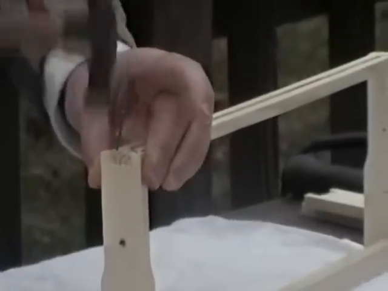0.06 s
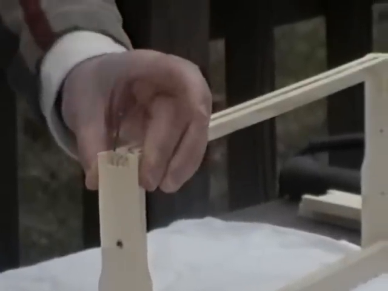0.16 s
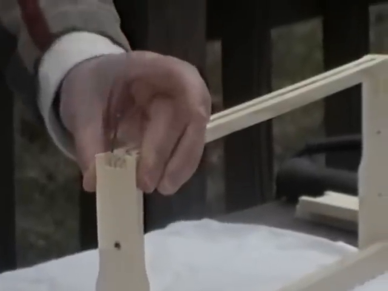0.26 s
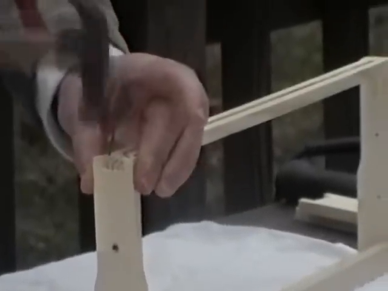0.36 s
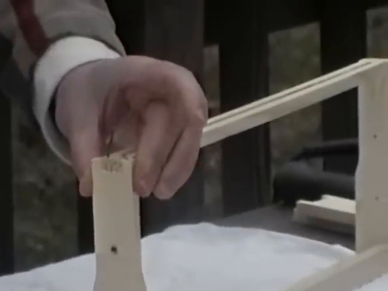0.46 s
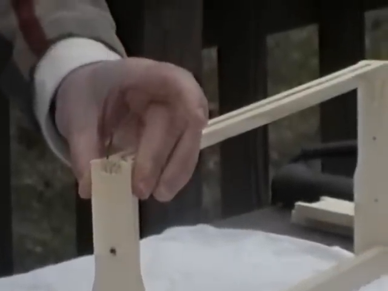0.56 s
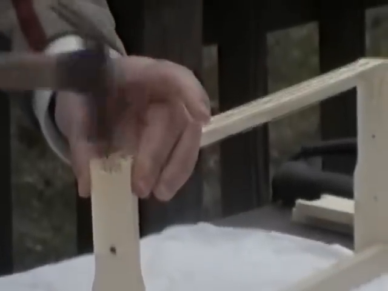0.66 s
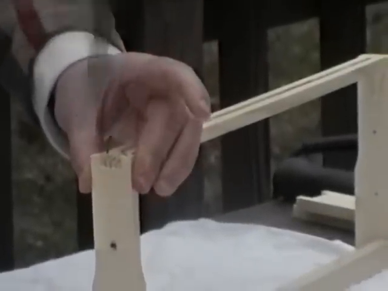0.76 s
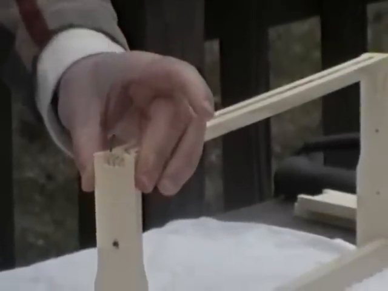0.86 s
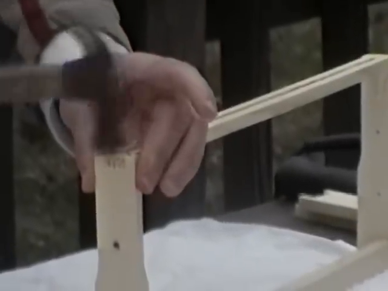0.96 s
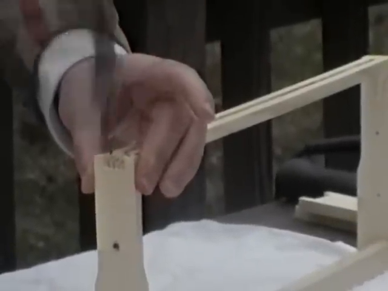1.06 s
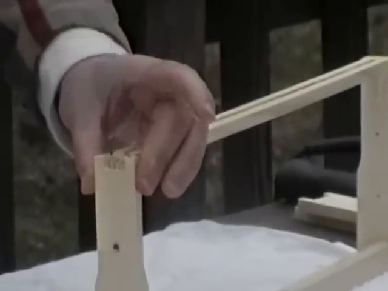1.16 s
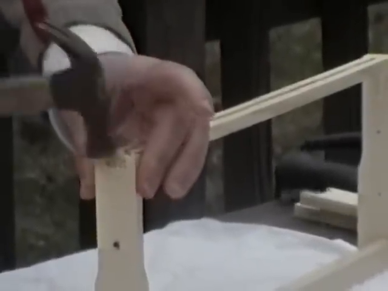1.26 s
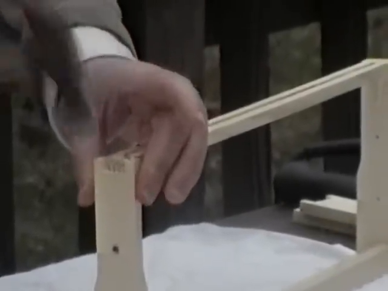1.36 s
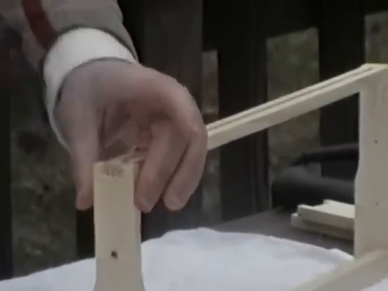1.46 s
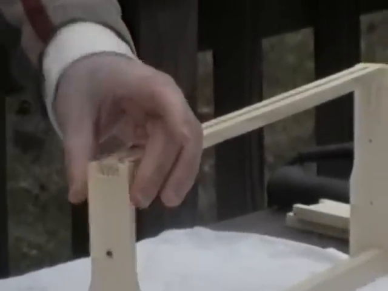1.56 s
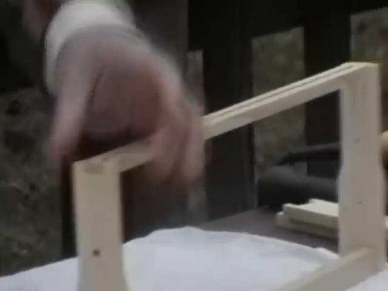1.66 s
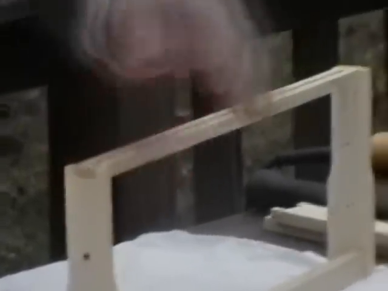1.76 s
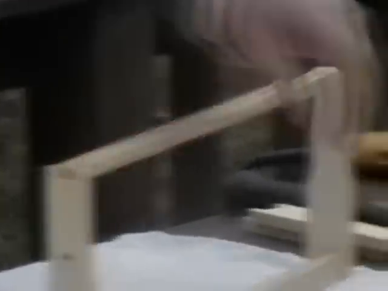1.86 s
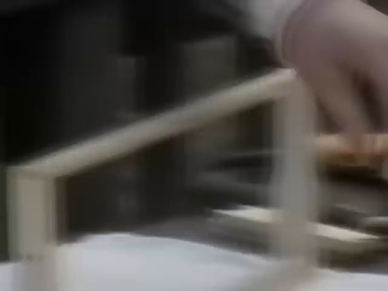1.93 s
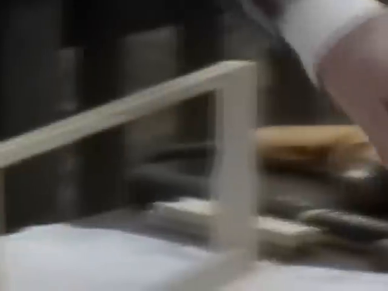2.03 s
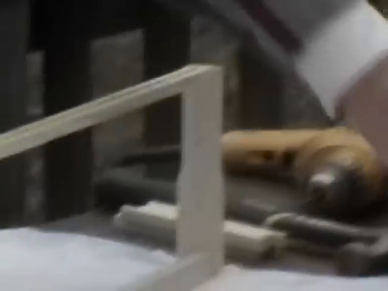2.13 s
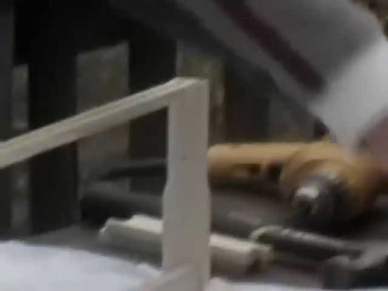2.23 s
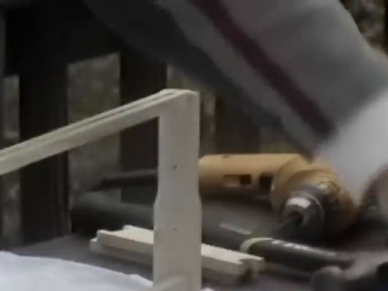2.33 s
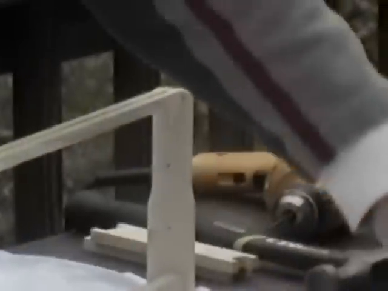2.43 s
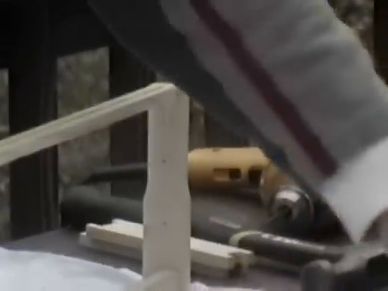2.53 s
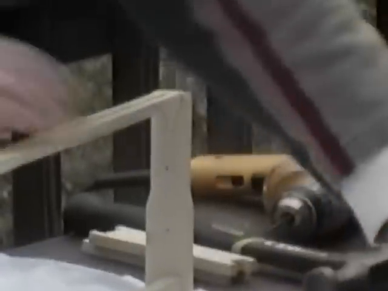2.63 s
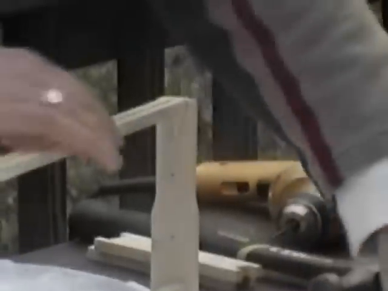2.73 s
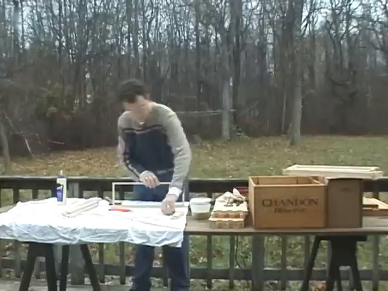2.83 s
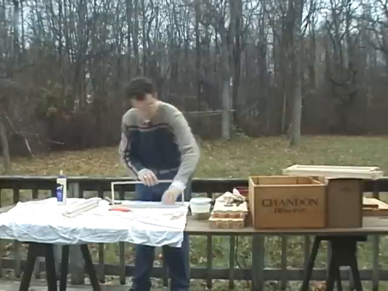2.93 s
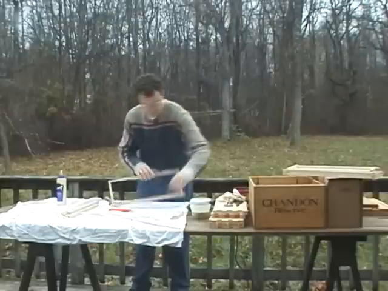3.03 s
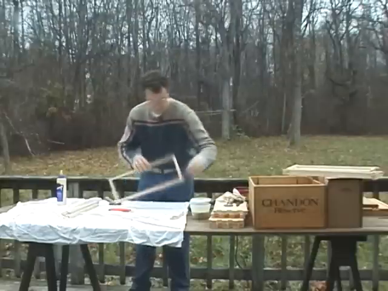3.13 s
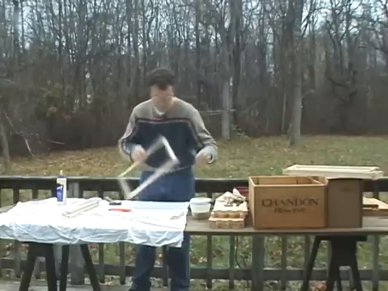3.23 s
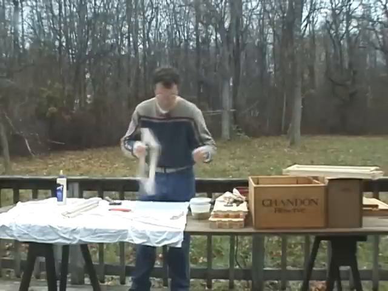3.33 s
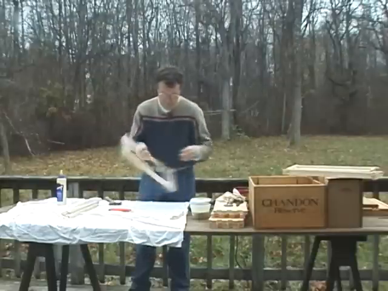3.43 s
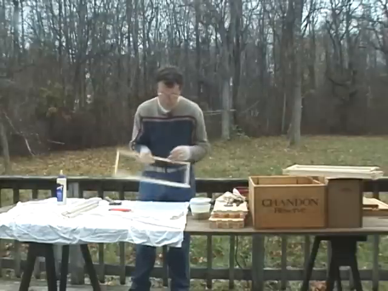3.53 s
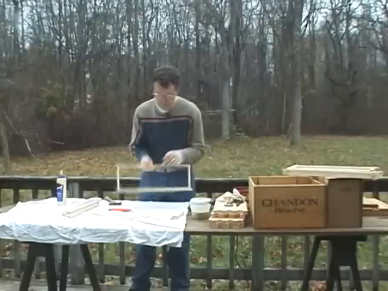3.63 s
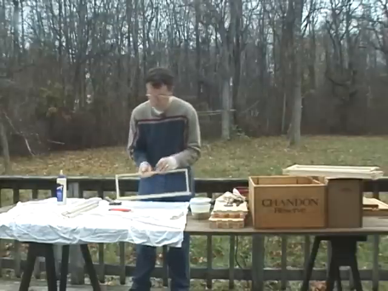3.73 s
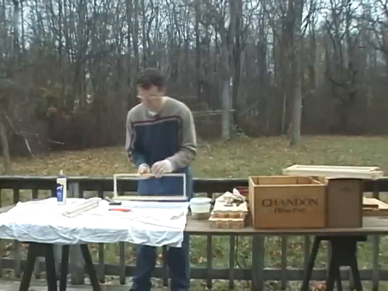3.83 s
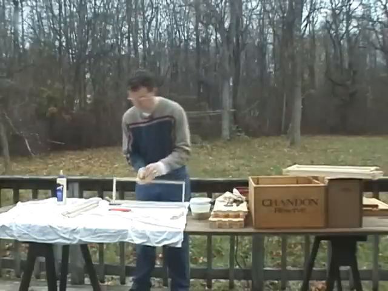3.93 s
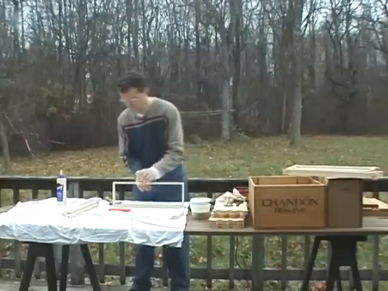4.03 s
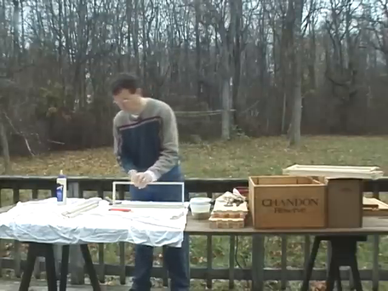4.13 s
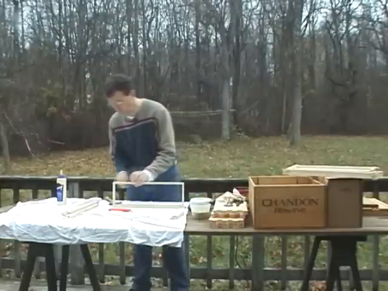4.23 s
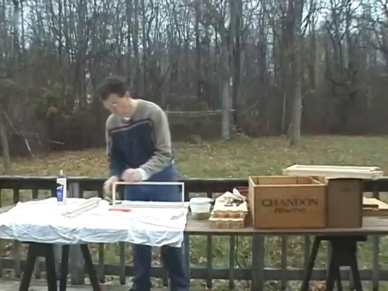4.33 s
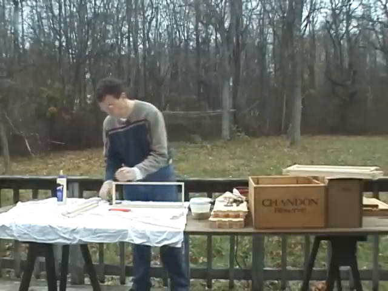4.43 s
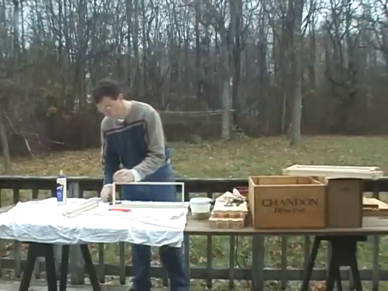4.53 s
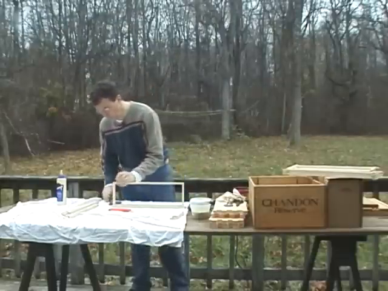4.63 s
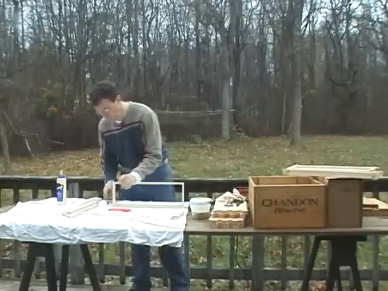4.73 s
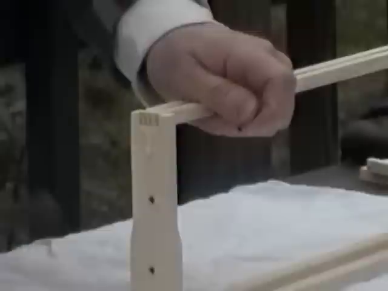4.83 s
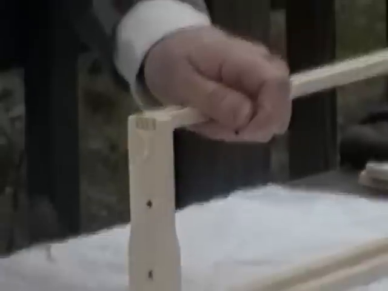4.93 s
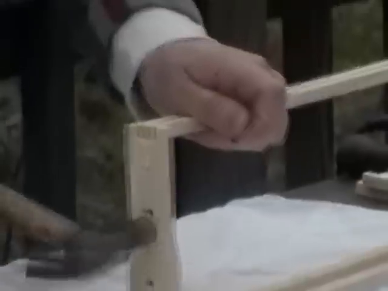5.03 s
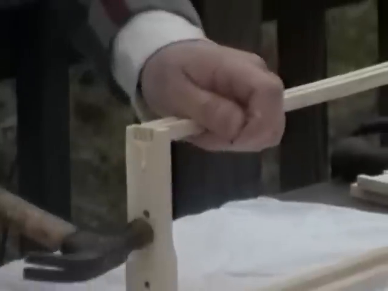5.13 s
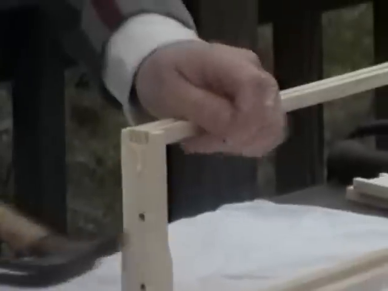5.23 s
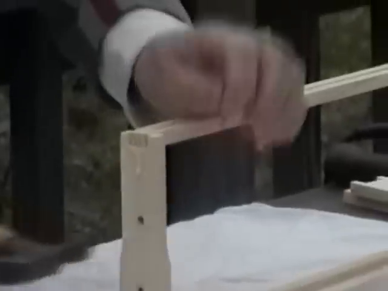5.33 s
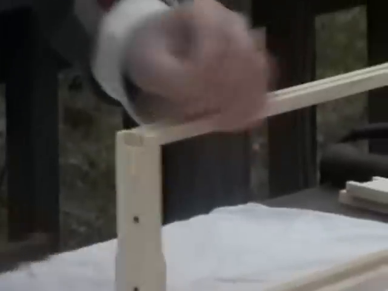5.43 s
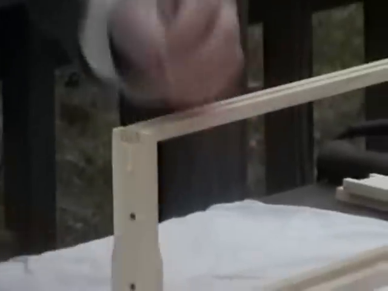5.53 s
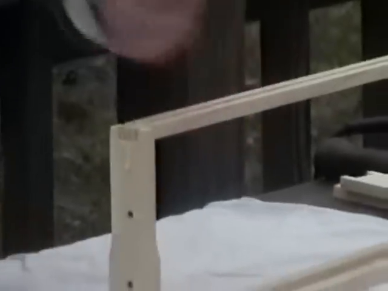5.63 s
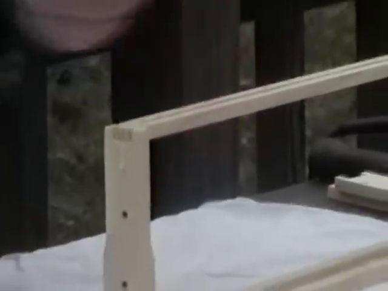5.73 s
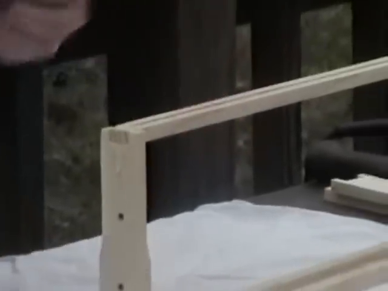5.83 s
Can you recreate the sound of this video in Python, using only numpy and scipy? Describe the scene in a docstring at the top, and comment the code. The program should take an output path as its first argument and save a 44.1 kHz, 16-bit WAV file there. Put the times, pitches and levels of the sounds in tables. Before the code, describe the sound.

Five steady, very loud wood-and-steel hammer blows, boxy and slightly clipped, shake loose nails and boards on the table. Then a clustered clatter as the hammer is set down, near quiet with tiny metallic ticks, a lighter knock as the frame is put down, and one last hard clack. Open yard, diffuse echo, low wind rumble, hiss and faint hum.

```python
"""Hard hammer knocks ring a trestle table on a garden deck as a small nail is driven into a wooden frame;
later the hammer and the frame are set down. Struck wood and steel are sums of decaying modes; chattering wood
is a train of random impacts; jingling nails and the thudding deck are shaped noise. A small microphone overloads
on the hardest knocks, over a diffuse echo, faint wind, hiss and hum."""
import sys
import numpy as np
from scipy import signal
from scipy.fft import rfft, irfft, next_fast_len
from scipy.io import wavfile
from scipy.ndimage import uniform_filter1d, map_coordinates

SR = 44100
rng = np.random.default_rng(int(sys.argv[2]) if len(sys.argv) > 2 else 0)


def volts(x):
    """Linear amplitude factor 10**(x/20) for a level x in dB, scalar or array-like."""
    e = np.asarray(x, float) / 20
    return 10 ** e


def wav_record(signal):
    """Record a signal, one row per channel, as 16-bit PCM in the file named by sys.argv[1]."""
    frames = np.transpose(np.atleast_2d(signal))
    bounded = np.clip(frames, -1, 1)
    # unit amplitude maps onto the largest positive 16-bit level
    quanta = np.round(bounded * 32767).astype(np.int16)
    wavfile.write(sys.argv[1], SR, quanta)


N = 259308
TIME = np.arange(SR // 2) / SR  # time axis of one short sound [s]
SPREAD_DB = 2.5  # random change of wood mode strengths from blow to blow

# knocks on the table: (time [s], blow level [dB], favoured wood pitch [Hz],
# steel click re blow [dB], shaking of loose things re blow [dB])
KNOCKS = [(0.089, 13, 545, -39.5, -48.5), (.4240, 12.5, 548, -26.5, -47), (0.7617, 10.5, 500, -22.5, -44),
          (1.0670, 13.5, 500, -25.5, -47), (1.35, 14, 440, -34, -48.5), (2.2904, -0.5, 651, -30, -66.5),
          (2.3006, 4, 601, -42, -65.5), (2.3742, 2.5, 408.5, -33, -64), (4.0688, -10, 332, -38, -60),
          (4.1055, 2.5, 522, -48.5, -66), (4.5840, -43.5, 276, -47.5, -26), (5.1530, -7.5, 1500, -4, -42.5)]
# modes of frame and table top: (frequency [Hz], relative level [dB], t60 [s])
WOOD_MODES = [(155, -4.5, 0.094), (187, -2.5, 0.12), (269, -34.5, 0.42), (290.8, -9.5, 0.19),
              (366, 3, 0.027), (466, 0, 0.034), (500, 7.5, 0.0033), (531, -6.5, 0.046), (600, 2.5, 0.027),
              (719.7, -6.5, 0.07), (792, -2, 0.037), (894, 0, 0.029), (992, -7, 0.12), (1054, -9.5, 0.098),
              (1127.7, -4.5, 0.051), (1272, 11, 0.015), (1513, -6.5, 0.11), (1440, -12.5, 0.03),
              (1588, -0.5, 0.032), (1700, -2, 0.031), (1870, -8.5, 0.11), (2092, -13, 0.091),
              (2360, -18.5, 0.09), (2840, -10, 0.034), (2920, -11.5, .04), (4020, -9, 0.03),
              (4850, -9.5, 0.027)]
# low rumble of wind and of the trembling deck: (frequency [Hz], relative level per Hz [dB])
RUMBLE_SPECTRUM = [(8.8, -55.5), (15, 16.5), (64, 8), (146, 1), (181, -3.5), (200, -8), (260, -43),
                   (440, -120)]


def unit(x):
    """Normalisation: scales a signal to rms 1."""
    return x / np.sqrt(np.mean(x ** 2) + 1e-20)


def along(points, hz):
    """Interpolation of (frequency [Hz], value) points on a logarithmic frequency axis."""
    f, v = np.transpose(points)
    return np.interp(np.log(hz + 1), np.log(f + 1), v)


def coloured(x, spectrum):
    """Linear filtering: multiplies the spectrum of x by a gain of (frequency [Hz], level [dB]) points."""
    size = x.shape[-1]
    padded = next_fast_len(size + 8192)
    gain = volts(along(spectrum, np.fft.rfftfreq(padded, 1 / SR)))
    return irfft(rfft(x, padded) * gain, padded)[..., :size]


def noise(spectrum, size):
    """Stationary random noise of rms 1 with the given spectrum."""
    return unit(coloured(rng.standard_normal(size), spectrum))


def decaying_noise(t60s, size):
    """Frequency-dependent damping: noise in which each frequency dies at its own speed."""
    hz, t, z = signal.stft(rng.standard_normal(size), SR, nperseg=256)
    decay = volts(-60 * t / along(t60s, hz)[:, None])
    return signal.istft(z * decay, SR, nperseg=256)[1][:size]


def wobble(rate):
    """Slow random modulation: a smooth curve through `rate` random knots a second."""
    knots = rng.standard_normal(int(N * rate / SR) + 4)
    return map_coordinates(knots, [np.arange(N) * rate / SR])


def add(track, s, sound):
    """Superposition: mixes a sound into the track from time s [s]."""
    part = track[round(s * SR):][:len(sound)]
    part += sound[:len(part)]


def fade(t60):
    """Exponential decay by 60 dB in t60 seconds."""
    return volts(-60 * TIME / t60)


def ring(modes, spread_db, centre_hz, focus_db):
    """Modal response to a smooth push that favours modes near centre_hz; peak 1, first swing downward."""
    hz, db, t60 = np.transpose(modes)[:, :, None]
    octaves = np.log2(hz / centre_hz)
    db = db + spread_db * rng.standard_normal(db.shape) - focus_db * octaves ** 2
    # far modes start out of step
    phase = 0.9 * rng.standard_normal(db.shape) * np.minimum(np.abs(octaves), 1)
    free = -np.sum(volts(db - 60 * TIME / t60) * np.sin(2 * np.pi * hz * TIME + phase), axis=0)
    # a softer contact, with a lower pitch, lasts longer
    contact = np.minimum(TIME[:300] * centre_hz / 0.4, 1)
    push = np.sin(np.pi * contact) ** 2
    sound = signal.fftconvolve(free, push)[:len(TIME)]
    # small boards radiate no deep bass
    sound = signal.lfilter(*signal.butter(2, 170, "high", fs=SR), sound)
    return sound / np.abs(sound).max()


def background():
    """Stationary ambience: lumpy noise for wind, smooth noise for hiss, and faint sinusoids for hum."""
    # distant rustle and hiss: (frequency [Hz], relative level per Hz [dB])
    air_spectrum = [(40, -67), (88, -37), (150, -2.5), (250, -5.5), (340, -7.5), (492, -8), (1250, -12.5),
                    (2570, -20), (6000, -21), (11100, -15.5), (14000, -11.5)]
    # steady tones: (frequency [Hz], mean rms level [dB])
    hum_tones = [(59.2, -70.5), (177.6, -80), (328.4, -76.5), (5394, -84.5)]
    t = np.arange(N) / SR
    lumpy = unit(volts(1.8 * wobble(24)) * noise(RUMBLE_SPECTRUM, N))
    wind = volts(-58.5 + 1.3 * wobble(2.0)) * lumpy
    hiss = volts(-58 + 0.08 * wobble(27)) * noise(air_spectrum, N)
    hum = np.zeros(N)
    for hz, db in hum_tones:
        hum += volts(db + 1.5 * wobble(18)) * np.sqrt(2) * np.sin(2 * np.pi * hz * t)
    return wind + hiss + hum


def yard_echo(x):
    """Diffuse reflection from house wall and trees: convolution with noise tails, new each quarter second."""
    # decay of the echo: (frequency [Hz], t60 [s])
    yard_decay = [(100, 0.067), (500, .4), (1300, 0.88), (2600, 0.9), (3400, 0.2)]
    # colour of the echo: (frequency [Hz], relative level [dB])
    yard_colour = [(300, 1), (1200, -3), (2400, 5), (4000, -2.5)]
    out, step, delay_s = np.zeros(N), SR // 4, 0.033
    for start in range(0, N, step):
        tail = coloured(decaying_noise(yard_decay, SR), yard_colour)
        tail /= np.linalg.norm(tail)
        add(out, start / SR + delay_s, signal.fftconvolve(x[start:start + step], tail))
    return out


def nail_ticks():
    """Free vibration of a touched nail: three close high modes that die quickly."""
    # nails being handled: (time [s], level [dB], frequency [Hz])
    touches = [(3.533, -57, 4700), (3.664, -52.5, 5840), (4.223, -49.5, 4280)]
    out = np.zeros(N)
    for s, db, hz in touches:
        modes = [(hz, 0, 0.03), (0.8 * hz, -5, 0.02), (1.1 * hz, -3, 0.02)]
        add(out, s, volts(db) * ring(modes, 1.5, hz, 0.5))
    return out


def rocking():
    """Repeated impact: the frame rocks three times after each knock, each landing weaker than the last."""
    period_s, pitch_hz = 0.0125, 400
    level_db, db_per_blow_db, loss_db = -17, 1.36, 3  # the loss is for each rock
    landings = []
    for s, db, *_ in KNOCKS:
        for k in range(3):
            late, high = rng.uniform(-1, 1, 2)
            landings.append((s + period_s * (k + 1 + 0.4 * late),
                             level_db + db_per_blow_db * db - loss_db * k,
                             pitch_hz * 2 ** (0.35 * high)))
    return landings


def bounces():
    """Damped modal impacts: short sounds of the rocking frame and of single wood impacts that skip thrice."""
    # wood impacts just after a knock or well after it, or touched by hand:
    # (time [s], level [dB], favoured pitch [Hz])
    wood_impacts = [(0.567, -25, 500), (0.601, -27.5, 551.4), (0.894, -23.5, 500), (1.199, -27, 500),
                    (1.471, -20.5, 400), (2.425, -12, 310), (2.444, -23.5, 310), (3.093, -47.5, 1200),
                    (3.616, -48, 1290), (4.586, -37, 295), (4.648, -44, 295), (5.156, -14.5, 4420),
                    (5.158, -11.5, 979), (5.161, -5.5, 600), (5.185, -18.5, 400)]
    skip_s, skip_loss_db = 0.006, 7  # period, and loss at each skip
    skips = []
    for s, db, hz in wood_impacts:
        for k, late in enumerate(rng.uniform(-1, 1, 3)):
            skips.append((s + skip_s * (k + 1 + 0.4 * late), db - skip_loss_db * (k + 1), 0.85 * hz))
    out = np.zeros(N)
    for s, db, centre_hz in [*rocking(), *wood_impacts, *skips]:
        damped = ring(WOOD_MODES, SPREAD_DB, centre_hz, 40.0) * fade(90 / centre_hz)
        add(out, s, volts(db) * damped)
    return out


def deck_tremble():
    """Slow forced vibration: low noise that swells within hundredths of a second and decays."""
    t = np.arange(SR) / SR
    swell = 1 - np.exp(-t / 0.012)
    decay = volts(-60 * t / 0.68)
    return swell * decay * noise(RUMBLE_SPECTRUM, SR)


def deck_thud():
    """Heavily damped low resonance of deck boards and trestles: bass noise with a soft onset."""
    # deck boards and trestles: (frequency [Hz], relative level per Hz [dB])
    deck_spectrum = [(15, -49), (28, -2.5), (45, -1.5), (70, -1.5), (100, -8.5), (125, -7), (154, -3.5),
                     (200, -17), (300, -71.5)]
    envelope = (1 - np.exp(-TIME / 0.008)) * fade(0.34)
    return envelope * noise(deck_spectrum, len(TIME))


def nail_jingle():
    """Many overlapping impacts: uneven bright noise whose frequencies die at different speeds."""
    # decay of the jingle: (frequency [Hz], t60 [s])
    settling = [(2000, 0.25), (6000, 0.13), (11000, 0.1)]
    # colour of the jingle: (frequency [Hz], relative level per Hz [dB])
    jingle_spectrum = [(600, -71.5), (1470, -19), (2500, -9.5), (3520, -19.5), (5210, -7.5), (6370, -3),
                       (7150, -9.5), (9500, -11), (12000, -16.5), (15000, -9.5)]
    uneven_db = 2.8 * unit(uniform_filter1d(rng.standard_normal(len(TIME)), size=160))
    body = unit(coloured(decaying_noise(settling, len(TIME)), jingle_spectrum))
    landing = 1 - np.exp(-(TIME / 0.035) ** 2)  # loose nails are in the air before they land
    return volts(uneven_db) * body * landing


def wood_chatter(db, centre_hz):
    """Random impact train convolved with a damped modal slap: loose wood rattles after the blow."""
    slap = ring(WOOD_MODES, SPREAD_DB, 1.565 * centre_hz, 2.2)
    slap *= fade(0.08)  # loose contact damps the ring of the wood
    rate = 1500  # mean impacts a second
    impacts = unit((rng.random(len(TIME)) < rate / SR) * rng.standard_normal(len(TIME)))
    onset = 1 - np.exp(-(TIME / 0.0015) ** 2)
    impacts *= onset * fade(0.16 * volts(0.27 * db))  # harder knocks rattle longer
    return signal.fftconvolve(impacts, slap / np.linalg.norm(slap))


def steel_click():
    """Short-lived steel modes of hammer head and nail, with a burst of noise at first contact."""
    # hammer head and nail: (frequency [Hz], relative level [dB], t60 [s])
    steel_modes = [(2520, 12.5, 0.0035), (3640, 14, 0.011), (4550, -1, .012), (5800, 0.5, .01),
                   (7700, -7.5, 0.0029), (8500, -22, .008)]
    # noise of the first contact: (frequency [Hz], relative level per Hz [dB])
    crack_spectrum = [(300, -48.5), (1000, -17), (2500, -8.5), (5000, 3), (10000, 4)]
    crack = 0.2 * fade(0.03) * noise(crack_spectrum, len(TIME))
    return ring(steel_modes, 5.3, 3400, 0.46) + crack


def knocks():
    """Impact excitation: steel clicks first, then the push reaches the wood; all that is loose jumps."""
    out = np.zeros(N)
    for s, db, centre_hz, click_db, jingle_db in KNOCKS:
        add(out, s, volts(db + click_db) * steel_click())
        add(out, s + 0.0006, volts(db) * ring(WOOD_MODES, SPREAD_DB, centre_hz, 6.5))
        # chatter grows less than the blow does, and rises with the steel click
        chatter_db = -9.5 - 0.3 * db + 0.34 * click_db
        add(out, s, volts(db + chatter_db) * wood_chatter(db, centre_hz))
        add(out, s, volts(db + jingle_db) * nail_jingle())
        # what shakes the nails shakes the deck
        add(out, s, volts(db + 0.62 * jingle_db + 6.0) * deck_thud())
        add(out, s, volts(db + 0.66 * jingle_db - 14.5) * deck_tremble())
    return out


def scene():
    """Superposition of the table sounds, their echo and the garden, as one channel."""
    table = knocks() + bounces() + nail_ticks()
    mix = table + volts(-32.0) * yard_echo(table) + background()
    return mix[None]


def roll_off(x):
    """The treble ends steeply here."""
    return signal.sosfilt(signal.butter(12, 12830, fs=SR, output="sos"), x)


def record(dry):
    """Saturation: the preamplifier rounds off loud swings, upward ones sooner; AC coupling lets tops sag."""
    # treble roll-off of the microphone: (frequency [Hz], gain [dB])
    mic_response = [(20, 0), (5000, 0), (9000, -4), (11500, -10), (12500, -30), (14000, -60)]
    ceiling, hardness = np.where(dry > 0, 0.58, 0.8), 3.5
    rounded = dry / (1 + np.abs(dry / ceiling) ** hardness) ** (1 / hardness)
    b, a = signal.butter(1, 35, "high", fs=SR)  # coupling capacitor
    sagging = signal.lfilter(b, a, rounded)
    finished = coloured(sagging, mic_response)
    return roll_off(finished)


dry = scene()
out = record(dry)
wav_record(out)
```